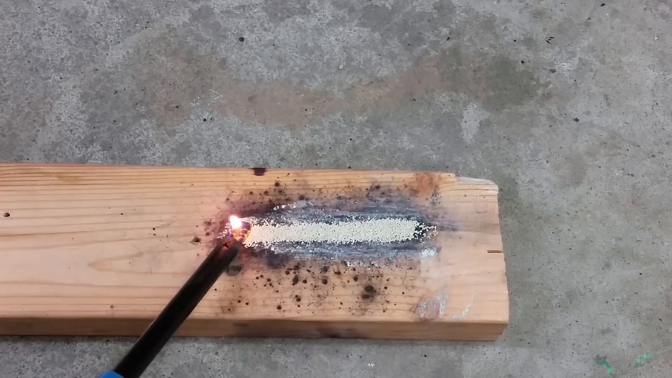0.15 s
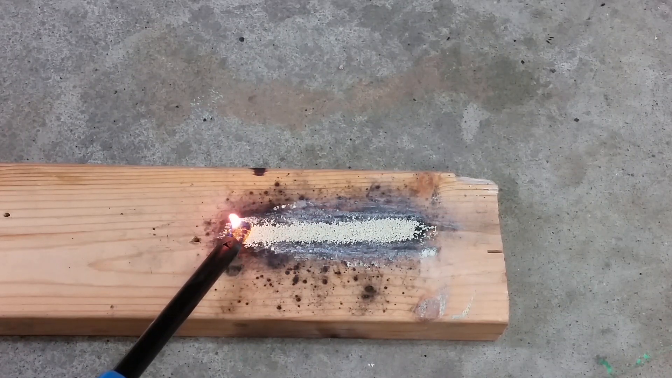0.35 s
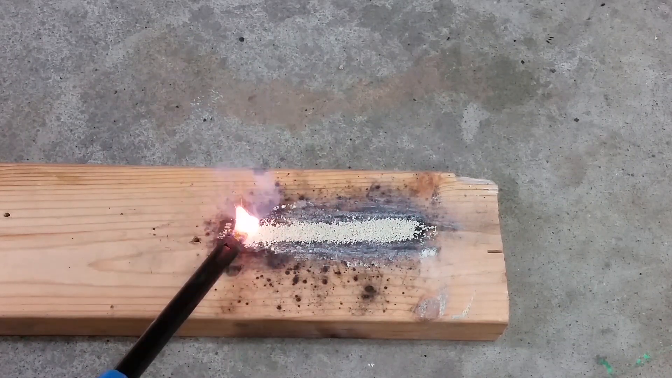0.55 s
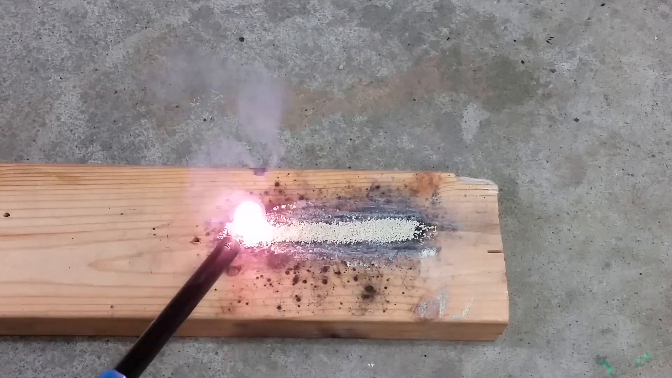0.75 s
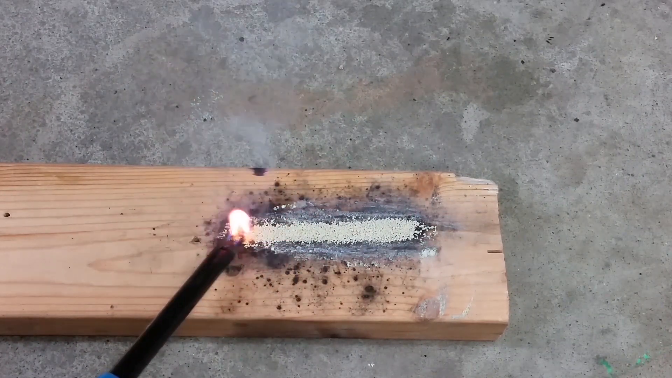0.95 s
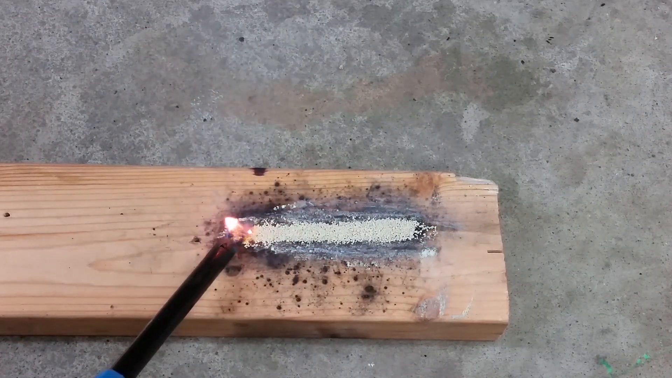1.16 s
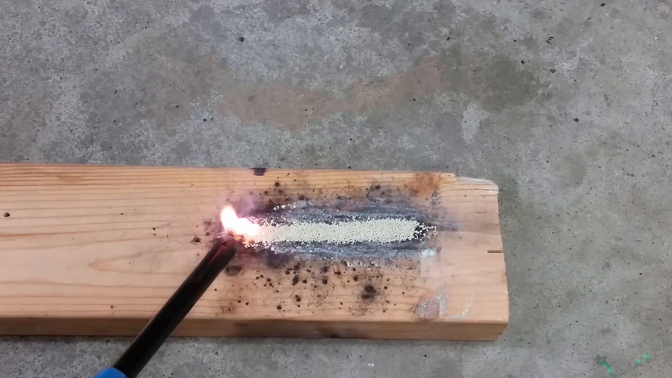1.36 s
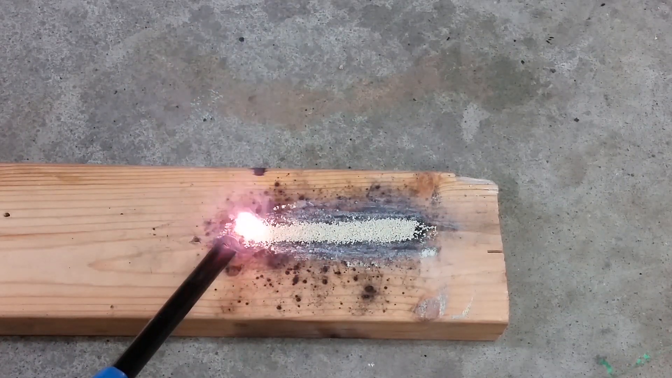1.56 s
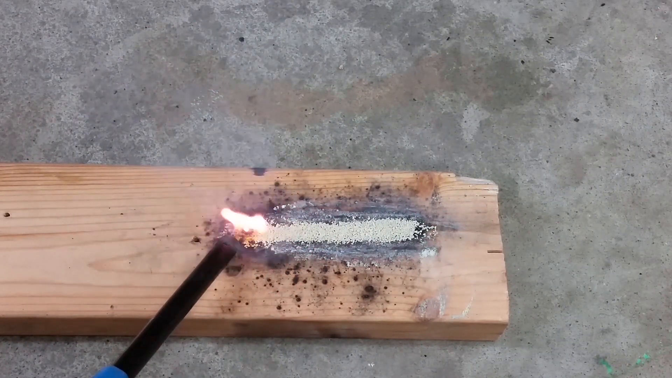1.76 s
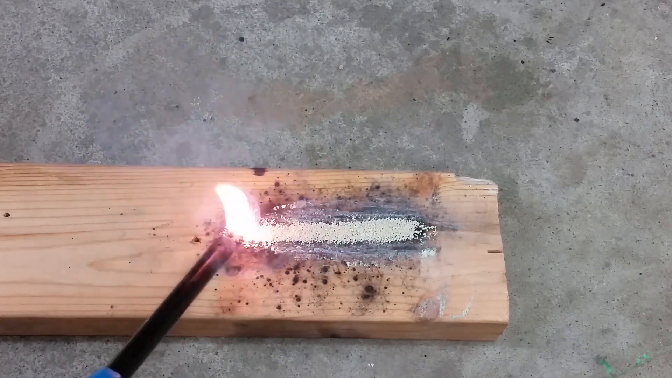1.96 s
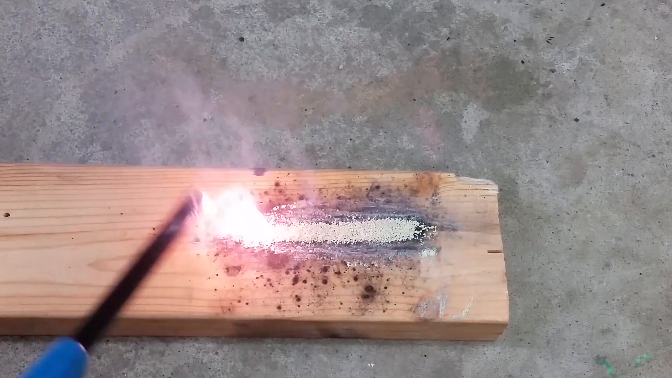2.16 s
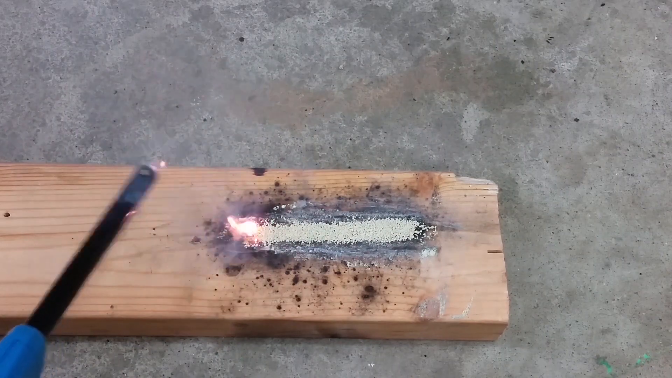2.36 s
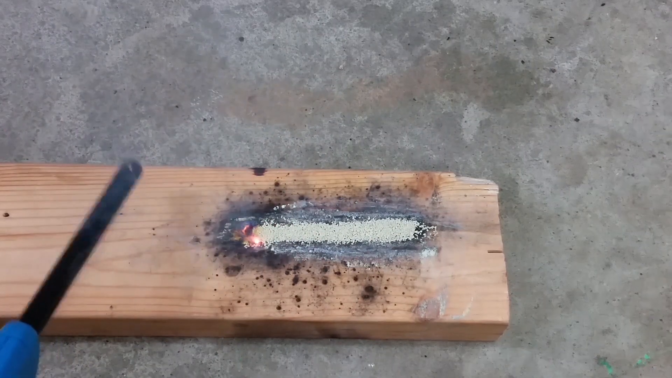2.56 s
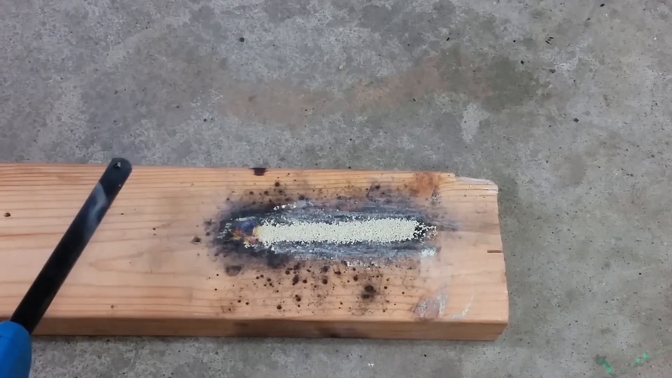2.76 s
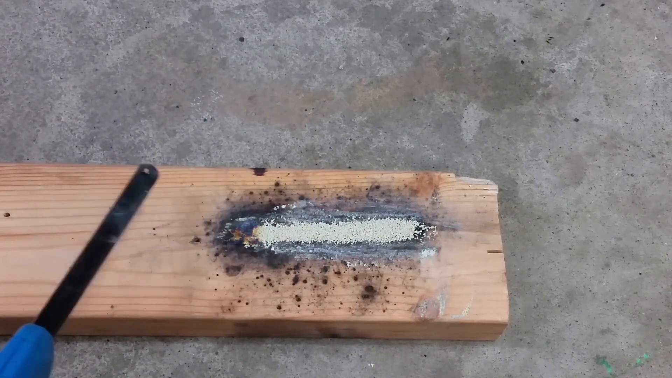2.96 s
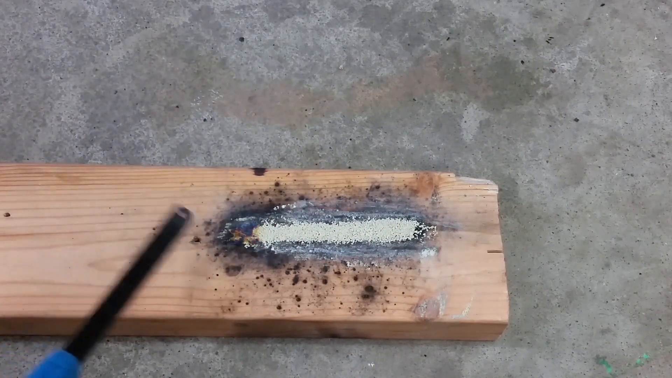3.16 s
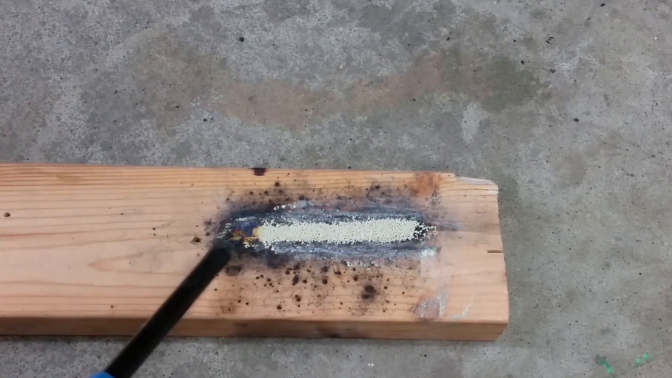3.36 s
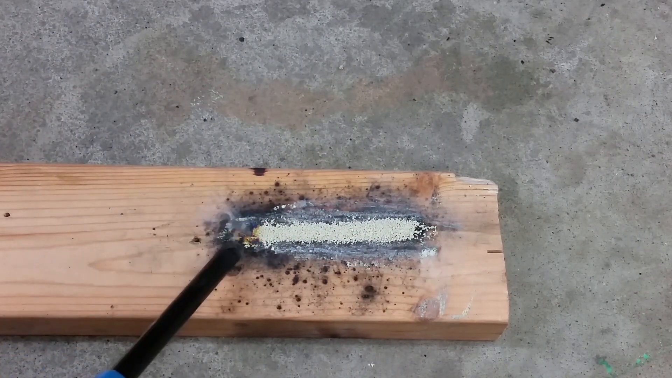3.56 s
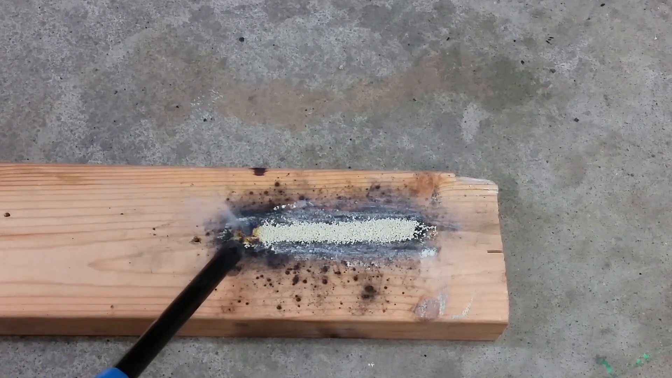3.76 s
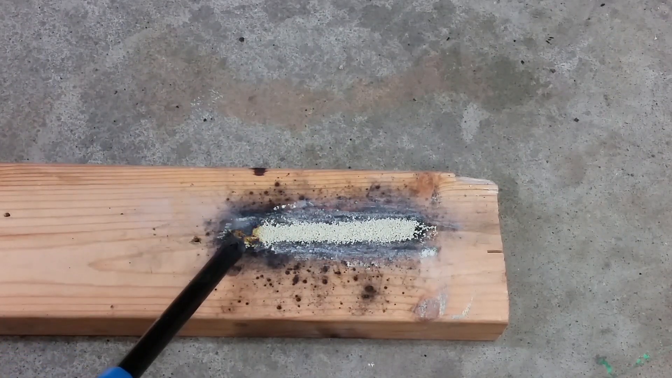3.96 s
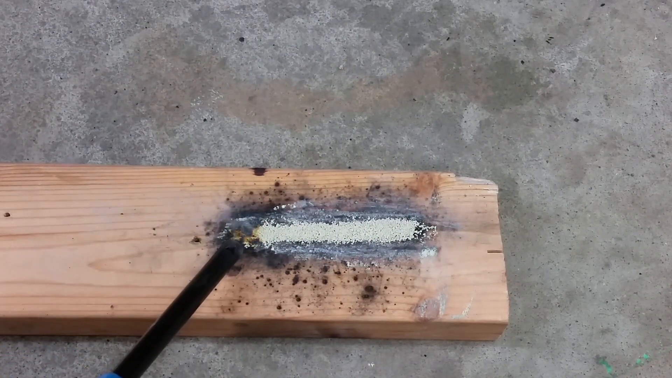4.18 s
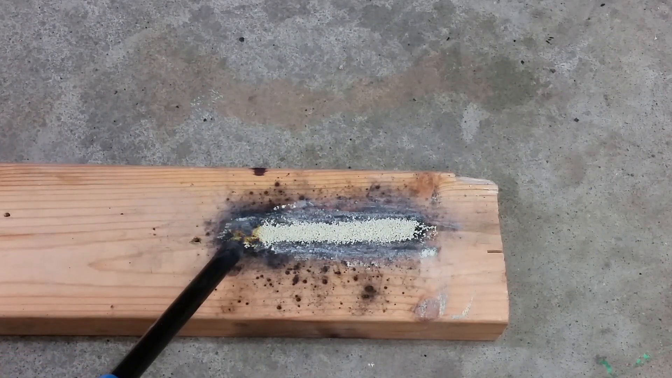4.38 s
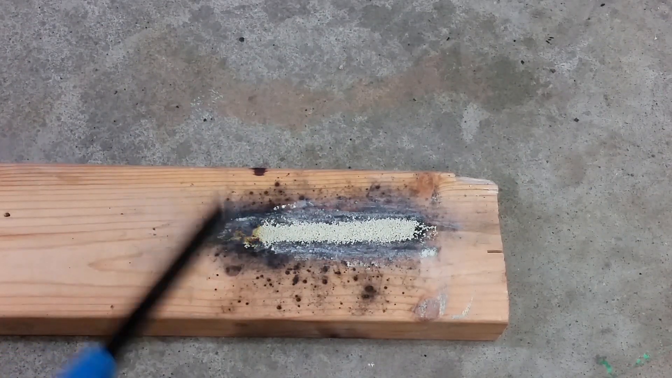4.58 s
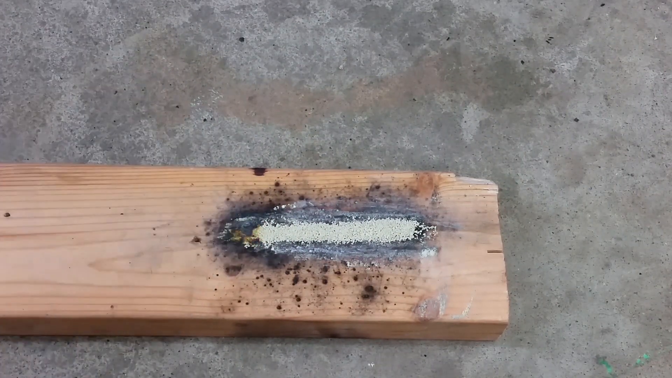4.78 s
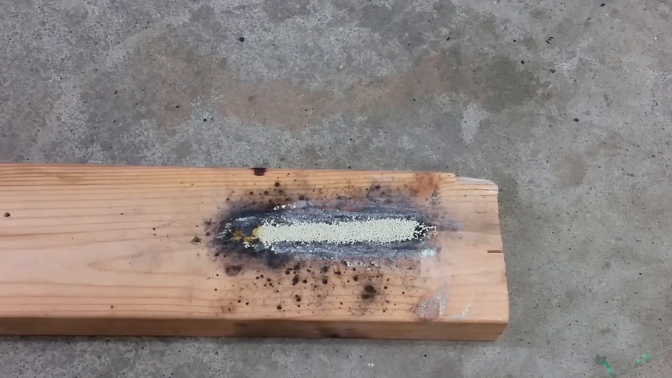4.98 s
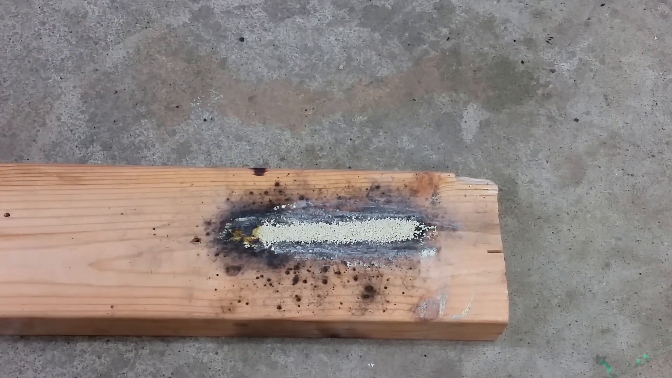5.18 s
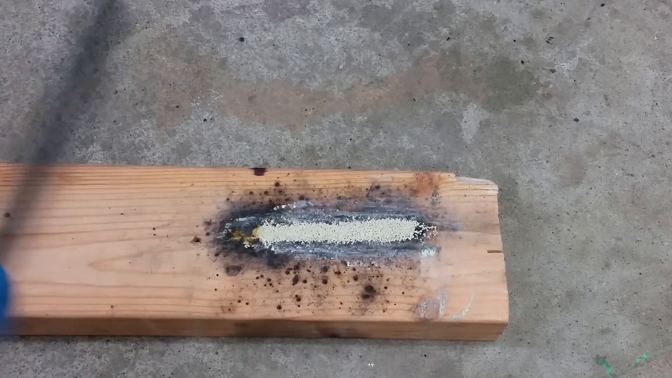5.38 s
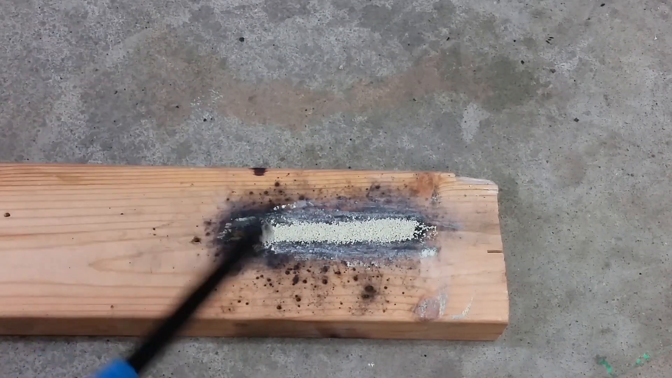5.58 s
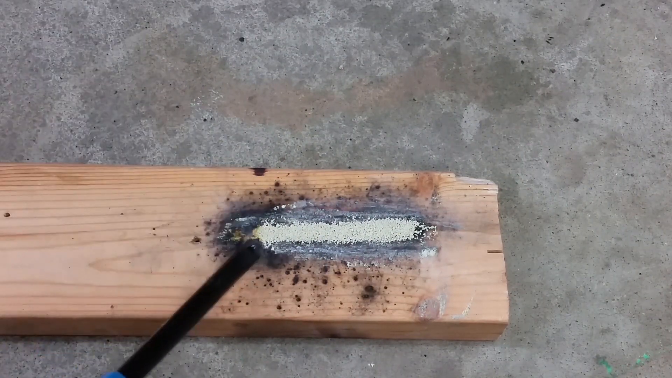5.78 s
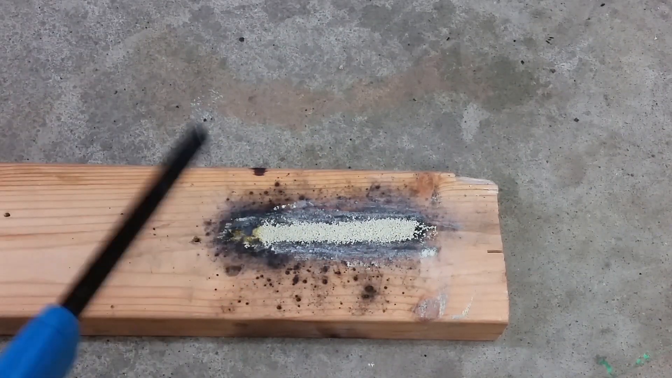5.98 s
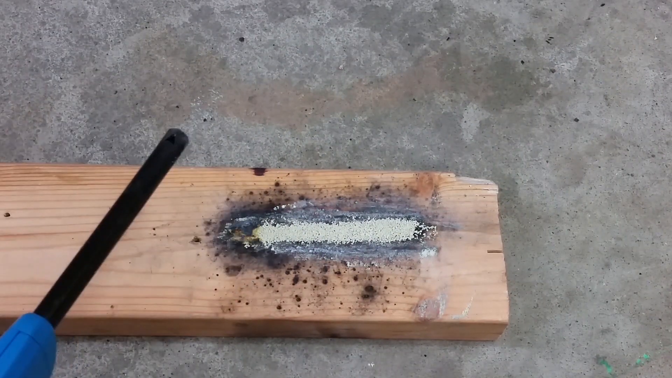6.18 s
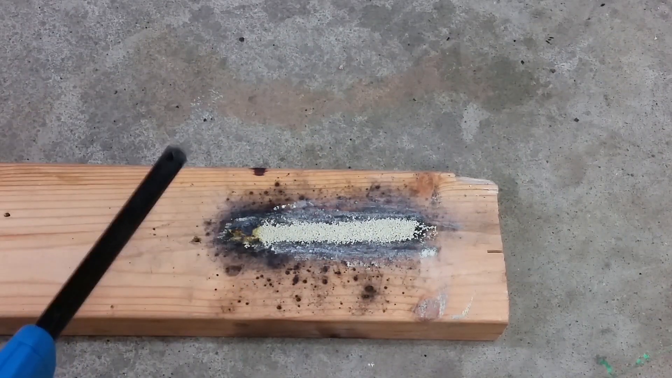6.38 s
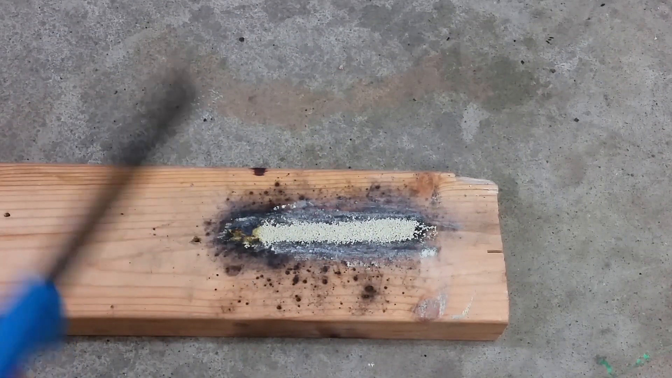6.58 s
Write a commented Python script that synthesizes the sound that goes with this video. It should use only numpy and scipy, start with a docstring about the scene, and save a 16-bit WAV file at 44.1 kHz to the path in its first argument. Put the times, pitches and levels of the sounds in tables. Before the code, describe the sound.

Bright fizzing bursts of burning powder die out, followed by sharp lighter clicks and small trigger ticks in an echoing garage.

```python
"""Powder flares again and again on a plank in a hard-walled garage, lit by a long gas lighter.
Its sputtering grains give a bright fizz and a lower jet roar, with two short whistles and dull knocks.
Later the loose trigger ticks and the igniter snaps, each snap followed by the garage's hissy echo,
which holds briefly, then fades.
A rumble near 80 Hz wavers underneath; two microphone ports hear the treble differently."""
import sys
import numpy as np
from scipy import signal
from scipy.fft import rfft, irfft, next_fast_len
from scipy.io import wavfile
from scipy.ndimage import uniform_filter1d, map_coordinates

SR = 44100
rng = np.random.default_rng(int(sys.argv[2]) if len(sys.argv) > 2 else 0)


def store_wav(level_fs):
    """Save 16-bit WAV to argv[1]."""
    pcm = np.round(np.clip(np.atleast_2d(level_fs), -1, 1) * 32767)
    wavfile.write(sys.argv[1], SR, pcm.T.astype(np.int16))


N = 292674

# Powder flares. Each row: catch in s, end in s, peak fizz in dB, jet in dB re fizz.
FLARES = [(0.444, .87, -43.5, -9), (0.915, 0.95, -49, -3.5), (1.01, 1.15, -49.5, -14.5),
          (1.173, 1.405, -49, -10.5), (1.43, 1.749, -46.5, -6.5), (1.793, 1.93, -49.5, -6),
          (1.913, 2.317, -41.5, -7.5), (2.342, 2.489, -40.5, -11), (2.547, 2.643, -48.5, -13)]
NOISE_TOP_HZ = 15750
RING_HZ, RING_T60_S = 9840, 0.0056  # trigger's metal part
SIDE = np.array([[.5], [-.5]])  # splits a left-right difference


def amp(db):
    """dB to gain."""
    return 10 ** (np.asarray(db) / 20)


def unit(x):
    """x at rms 1."""
    return x / np.sqrt(np.mean(x ** 2) + 1e-20)


def along(points, hz):
    """Interpolate (Hz, value) points on a log axis."""
    f, v = np.transpose(points)
    return np.interp(np.log(hz + 1), np.log(f + 1), v)


def curves(rows):
    """One value per sample for each column after the time."""
    times_s, *cols = np.transpose(rows)
    return [np.interp(np.arange(N) / SR, times_s, c) for c in cols]


def wobble(rate_hz):
    """Smooth random curve with knots at rate_hz."""
    knots = rng.standard_normal(int(N * rate_hz / SR) + 4)
    return map_coordinates(knots, [np.arange(N) * rate_hz / SR])


def filtered(x, response):
    """Apply a complex frequency response."""
    n = x.shape[-1]
    m = next_fast_len(n + 4096)
    return irfft(rfft(x, m) * response(np.fft.rfftfreq(m, 1 / SR)), m)[..., :n]


def add(out, start_s, x):
    """Mix x into out."""
    part = out[:, round(start_s * SR):][:, :x.shape[-1]]
    part += x[..., :part.shape[1]]


def rush(spectrum, size, alike=1):
    """Stereo noise of rms 1, partly shared by both ports."""
    # Port likeness. Each row: frequency in Hz, left-right correlation.
    likeness = [(60, 1), (130, 0.92), (250, 0.68), (400, 0.91), (700, 0.21), (2000, 0.645), (5000, 0.13),
                (9000, 0.19), (13000, 0.193)]

    def shape(hz):
        angle = np.arccos(np.clip(alike * along(likeness, hz), 0, 1)) / 2
        return amp(along(spectrum, hz)) * (hz < NOISE_TOP_HZ) * [np.cos(angle), np.sin(angle)]

    mid, side = filtered(rng.standard_normal((2, size)), shape)
    return unit(np.array([mid + side, mid - side]))


def garage_decay(pair, hold_s):
    """After the hold, each frequency fades at the rate of the garage's echo."""
    # Reverberation. Each row: frequency in Hz, T60 in s.
    t60_s = [(300, 0.51), (1500, 0.61), (3000, .55), (5000, 0.5), (10000, 0.32), (15000, 0.33)]
    hz, t, z = signal.stft(pair, SR, nperseg=256)
    fade = amp(-60 * np.maximum(t - hold_s, 0) / along(t60_s, hz)[:, None])
    return signal.istft(z * fade, SR, nperseg=256)[1][:, :pair.shape[1]]


def garage_echo(x):
    """Wall reflections: x through a decaying noise tail of unit energy."""
    noise = filtered(rng.standard_normal((2, SR // 2)), lambda hz: hz < NOISE_TOP_HZ)
    tail = garage_decay(noise, hold_s=0)
    return signal.fftconvolve(x[None], tail / np.linalg.norm(tail[0]), axes=1)


def background():
    """A rumble throbs unevenly over faint hiss."""
    # Low rumble. Each row: time in s, level in dB.
    hum_levels = [(0, -50.5), (.12, -39.5), (.45, -45.5), (.86, -41.5), (1, -50.5), (1.14, -41),
                  (1.25, -49.5), (2.7, -44.5), (2.82, -55.5), (3.36, -54.5), (3.62, -47.5), (3.9, -54.5),
                  (4.7, -51.5), (4.9, -60), (6.08, -55), (6.64, -62.5)]
    # Higher layers. Each row: time in s, then upper rumble, wide hiss and top hiss in dB.
    air_levels = [(0, -58.5, -66.5, -83), (.45, -54, -66, -86), (1.5, -55, -61, -98.5),
                  (2.7, -55, -59, -100.5), (3, -64.5, -71, -100), (4.5, -63.5, -70.5, -105),
                  (6.64, -66.5, -77.5, -108)]
    # Layer spectra. Each row: frequency in Hz, relative density in dB.
    hum_spectrum = [(12, -40.5), (20, -13), (31, -14.5), (50, -12), (66, -2.5), (79, 0), (92, -4.5),
                    (140, -14.5), (180, -45.5), (310, -120)]
    upper_spectrum = [(71, -28), (120, 0.5), (156, 2.5), (210, -6.5), (300, -13), (390, -37.5), (660, -120)]
    wide_spectrum = [(150, -42.5), (250, -3), (420, -9), (494, -9), (640, -16), (842, -18.5), (1920, -30.5),
                     (6080, -33), (7030, -40), (12000, -37.5), (15600, -66), (22000, -120)]
    top_spectrum = [(9000, -37.5), (12500, -10), (16000, -4)]
    hum_db, = curves(hum_levels)
    upper_db, wide_db, top_db = curves(air_levels)
    throb_db = 0.67 * wobble(14) + 1.3 * wobble(4.04)
    hum = amp(hum_db) * unit(amp(throb_db) * rush(hum_spectrum, N))
    upper = amp(upper_db + 2.4 * wobble(11)) * rush(upper_spectrum, N)
    wide = amp(wide_db) * rush(wide_spectrum, N, alike=0.285)
    top = amp(top_db) * rush(top_spectrum, N, alike=0)
    return hum + upper + wide + top


def knocks(t60_s=.033):
    """Damped single modes of plank and handle."""
    # Each row: start in s, level in dB, pitch in Hz.
    modes = [(.312, -70, 707), (1.507, -23, 180), (2.473, -30.5, 399), (3.374, -57.5, 1520),
             (3.377, -45.5, 284), (5.044, -36, 100.3), (5.062, -33, 174), (5.676, -62, 1510),
             (5.928, -48, 350)]
    out, t = np.zeros((2, N)), np.arange(SR // 3) / SR
    for start_s, db, hz in modes:
        attack = 1 - np.exp(-t * hz * 3.4)
        ring = amp(db - 60 * t / t60_s) * attack * np.sin(2 * np.pi * hz * t)
        add(out, start_s, ring[None])
        add(out, start_s + .012, amp(-6.5) * garage_echo(ring))
    return out


def flare_envelope(peaks_db, decay, smoulder_db, catch_s=0.052, swell_db_per_s=20):
    """Each flare catches, swells, falls fast and lingers; steady smouldering fills the gaps."""
    fall_db_per_s, linger_db, linger_db_per_s = decay
    t = np.arange(N) / SR
    lit = lambda start_s: np.clip((t - start_s) / catch_s, 0, 1) ** 2
    burnt_out_s = np.maximum(t - FLARES[-1][1], 0)
    power = (lit(FLARES[0][0]) * amp(smoulder_db - fall_db_per_s * burnt_out_s)) ** 2
    for (start_s, end_s, *_), db in zip(FLARES, peaks_db):
        after_s = np.maximum(t - end_s, 0)
        swell = lit(start_s) * amp(db - swell_db_per_s * np.maximum(end_s - t, 0))
        fall = amp(-fall_db_per_s * after_s)
        linger = amp(linger_db - linger_db_per_s * after_s)
        power += swell ** 2 * (fall ** 2 + linger ** 2)
    return np.sqrt(power)


def patchy(pair, depth_db):
    """Random gain patches over time and frequency; rms 1."""
    z = signal.stft(pair, nperseg=256)[2]
    field = uniform_filter1d(rng.standard_normal(z.shape[1:]), size=5, axis=0)
    field = uniform_filter1d(field, size=10, axis=1)
    return unit(signal.istft(z * amp(depth_db * unit(field)), nperseg=256)[1][:, :N])


def burning_powder():
    """Sputtering grains make fizz and jet flicker together."""
    # Flame spectra. Each row: frequency in Hz, relative density in dB.
    fizz_spectrum = [(2240, -51.5), (3800, -18), (5800, -16.5), (6900, -24.5), (7900, -19.5), (8900, -2),
                     (10300, 2), (11100, -1), (12500, 2), (13500, -5.5), (14500, 0.5), (16000, -6.5)]
    jet_spectrum = [(150, -18.5), (250, -7), (369, -6.5), (435, -13), (1040, -15.5), (2140, -9.5),
                    (3480, -16), (3870, -26.5), (4200, -25.5), (5460, -67), (9240, -120)]
    # Flare decays. Each: fall in dB/s, linger in dB re peak, linger's fall in dB/s.
    fizz_decay = (217, -9, 120)
    jet_decay = (233, -10, 56)
    *_, fizz_db, jet_rel_db = np.transpose(FLARES)
    sputter_db = 0.38 * wobble(25.87) + 0.88 * wobble(90) + 0.23 * wobble(400)
    fizz_gain = flare_envelope(fizz_db, fizz_decay, smoulder_db=-57) * amp(sputter_db)
    jet_gain = flare_envelope(fizz_db + jet_rel_db, jet_decay, smoulder_db=-68.5) * amp(.5 * sputter_db)
    fizz = fizz_gain * patchy(rush(fizz_spectrum, N), depth_db=2.25)
    jet = jet_gain * patchy(rush(jet_spectrum, N), depth_db=2.5)
    return fizz + jet


def whistles(flat_ratio=0.0325, glide_s=0.029):
    """Unsteady, slightly rising tones that swell and stop, each over a fainter, lower one."""
    # Each row: start in s, length in s, pitch in Hz, level in dB.
    tones = [(0.659, .108, 1250, -47), (0.932, 0.0996, 1608, -38)]
    undertones = [(start_s, 0.083, .925 * hz, -53.5) for start_s, _, hz, _ in tones]
    out = np.zeros((2, N))
    for start_s, length_s, hz, db in tones + undertones:
        t = np.arange(round(length_s * SR)) / SR
        lag_s = flat_ratio * glide_s * (1 - np.exp(-t / glide_s))
        phase = 2 * np.pi * hz * (t - lag_s) + 0.93 * wobble(64)[:len(t)]
        swell = np.abs(np.sin(np.pi * (t / length_s) ** 1.86)) ** 0.54
        tone = swell * np.sin(phase)
        add(out, start_s, amp(db) * tone * [[.9], [.4]])
        add(out, start_s + 0.015, amp(db - 10) * garage_echo(tone))
    return out


def snaps_and_ticks():
    """Igniter and trigger: a crack, a low thud and a metal ring, then rattle and echo."""
    # Igniter snaps. Each row: start in s, peak in dB, thud in dB re peak, left-right in dB,
    # echo tail in dB re peak, tilt above 9.5 kHz in dB/octave.
    snaps = [(2.4737, -17, -9.5, -2.5, -25, -13.5), (3.4682, -26.5, -14, 0.5, -13, -5),
             (4.3336, -23.5, -19.5, 0, -18.5, -3.5), (5.0353, -18, -24.5, 4.5, -26.5, -1),
             (6.2872, -30.5, -15.5, -4, -14, 1)]
    # Trigger ticks. Each row: start in s, peak in dB, thud and echo tail in dB re peak.
    ticks = [(3.1772, -66.5, 5.5, -25), (3.898, -64, -5, -17), (3.9233, -63, -2, -18),
             (3.956, -58, 0.5, -24), (3.9811, -42, -11, -21), (4.0622, -53.5, -7.5, -14.5),
             (4.6, -54, -2, -20), (4.6279, -46, -9, -19), (4.6466, -32.5, -14.5, -25.5),
             (4.786, -43.5, -11, -18), (4.803, -52.5, -8, -19), (4.8193, -51, -13.5, -25),
             (4.891, -55.5, -25, -23), (4.9426, -62.5, -17, -12), (5.884, -68.5, -4, -22),
             (5.91, -56, -5.5, -24), (5.9292, -43.5, -9.5, -19), (6.0194, -51, -7, -14),
             (6.035, -56, -2, -11), (6.2978, -31.5, -41, -26), (6.571, -49, -19, -20),
             (6.588, -45, -13.5, -19.5)]
    # Crack spectrum. Each row: frequency in Hz, relative density in dB.
    crack_spectrum = [(1470, -49.5), (2500, -42.5), (5000, -15), (7110, -24), (9710, -13.5), (13400, -8),
                      (16800, -13.5)]
    events = [(*row, -19) for row in snaps]
    events += [(s, db, thud_db, 3, echo_db, -5, -2) for s, db, thud_db, echo_db in ticks]
    out, t = np.zeros((2, N)), np.arange(SR // 50) / SR
    rise_s = np.array([[.0009], [.0016]])  # spark, slower handle
    handle_band = lambda hz: 1j * hz * 1600 / (1300 ** 2 - hz * hz + 1j * hz * 1600)
    for start_s, db, thud_db, pan_db, echo_db, db_per_octave, ring_db in events:
        tilt = lambda hz: amp(db_per_octave * np.log2(np.maximum(hz / 9500, 1)))
        spark, handle = t / rise_s * np.exp(1 - t / rise_s) * rng.standard_normal((2, len(t)))
        crack = filtered(spark, lambda hz: amp(along(crack_spectrum, hz)) * tilt(hz))
        crack /= np.abs(crack).max()
        thud = filtered(handle, handle_band)
        thud /= np.abs(thud).max()
        ring = amp(ring_db) * metal_ring(t, RING_HZ * rng.normal(1, 0.018))
        add(out, start_s, amp(db + SIDE * pan_db) * (crack + amp(thud_db) * thud + ring))
        add(out, start_s + .01, amp(db + thud_db - 5) * garage_echo(thud))
        add(out, start_s + 0.0051, amp(db - 5.5) * garage_echo(ring))
        add(out, start_s, amp(min(db, -40) - 14.5) * rattle(count=4))
        add(out, start_s, echo_tail(db + echo_db, tilt))
    return out


def metal_ring(t, hz):
    """One damped mode of the trigger's metal part."""
    return amp(-60 * t / RING_T60_S) * np.sin(2 * np.pi * hz * t)


def rattle(count, fall_db_per_s=150):
    """The loose trigger ticks a few more times, dying away."""
    kicks, t = np.zeros(SR // 8), np.arange(SR // 100) / SR
    kicks[rng.integers(SR // 100, len(kicks), count)] = rng.exponential(size=count)
    kicks *= amp(-fall_db_per_s * np.arange(len(kicks)) / SR)
    return np.convolve(kicks, metal_ring(t, RING_HZ))[None]


def echo_tail(db, tilt, rise_s=0.0074):
    """The garage's hissy echo of a crack; its level holds briefly, then fades."""
    # Echo spectrum. Each row: frequency in Hz, relative density in dB.
    spectrum = [(180, -31), (350, -7.5), (700, -29), (1100, -31.5), (1500, -13.5), (1750, -14.5),
                (2300, -20.5), (2800, -16.5), (3000, -9), (3250, -19.5), (3800, -21), (5200, -12),
                (7800, -12.5), (9300, -2), (10600, 0), (15200, -3.5), (16000, -2)]
    t = np.arange(SR // 2) / SR
    rise = np.clip(t / rise_s, 0, 1) ** 2
    hold_s = max(0.0027 * (db + 63.5), 0)
    clumps_db = 1.5 * wobble(700)[:len(t)]
    hiss = filtered(rush(spectrum, len(t)), tilt)
    return amp(db + clumps_db) * rise * garage_decay(hiss, hold_s)


def scene():
    """All sources, in stereo."""
    return burning_powder() + whistles() + snaps_and_ticks() + knocks() + background()


def record(dry):
    """Two band-limited ports differ in colour; the right hears later."""
    # Port balance. Each row: frequency in Hz, left-right in dB.
    balance = [(300, -0.5), (1300, -1.5), (2400, -2), (4400, 4), (8100, -4.5), (15000, -2.5)]
    lag_s, top_hz = 4 / SR, 16950

    def response(hz):
        colour = amp(SIDE * along(balance, hz))
        delay = np.exp(2j * np.pi * hz * lag_s * SIDE)
        return colour * delay * np.clip((top_hz - hz) / 100, 0, 1)

    return filtered(dry, response)


dry = scene()
out = record(dry)
store_wav(out)
```